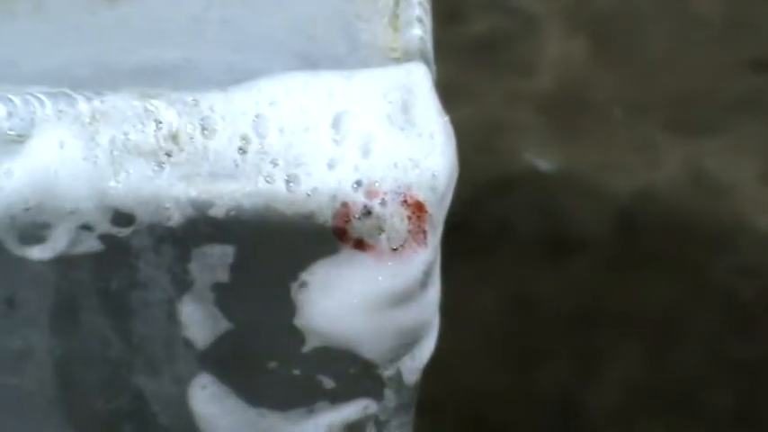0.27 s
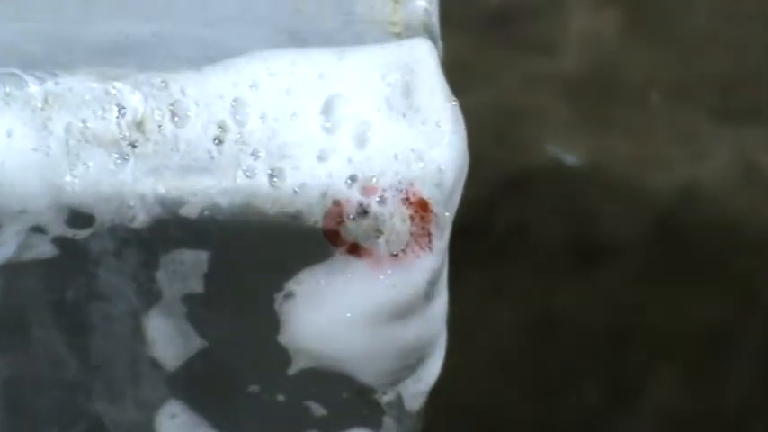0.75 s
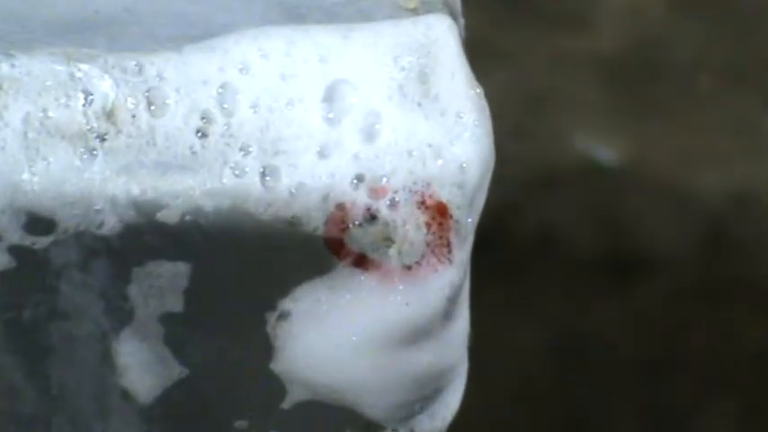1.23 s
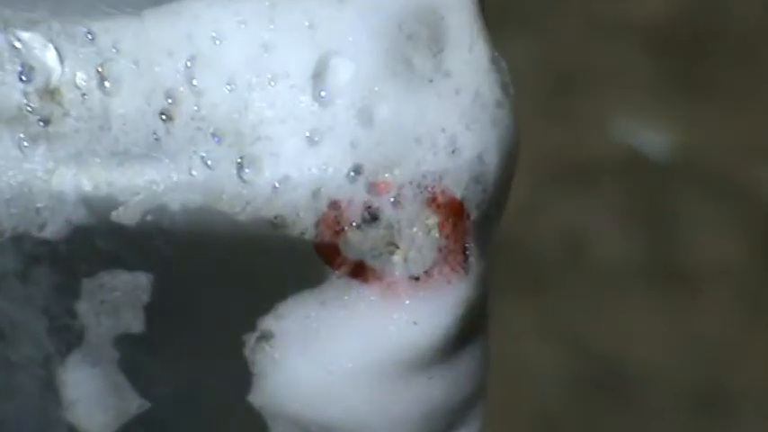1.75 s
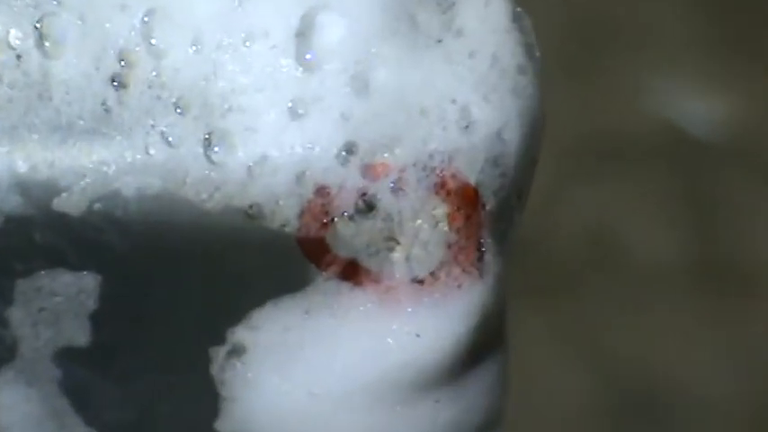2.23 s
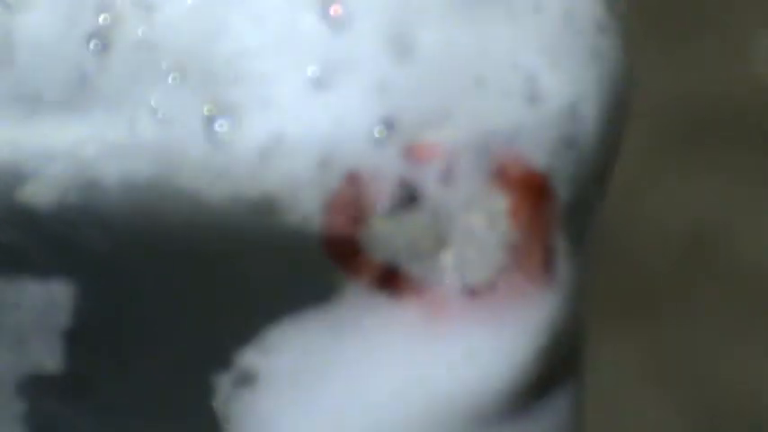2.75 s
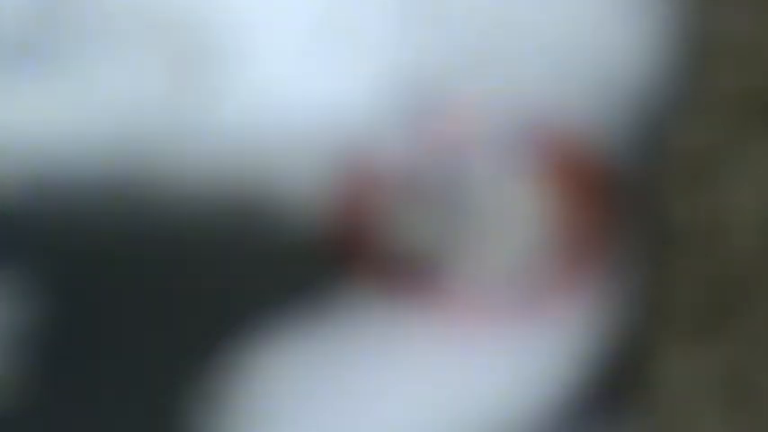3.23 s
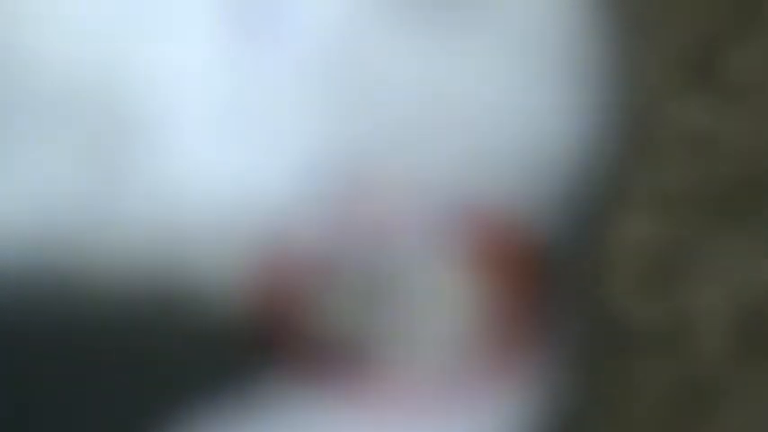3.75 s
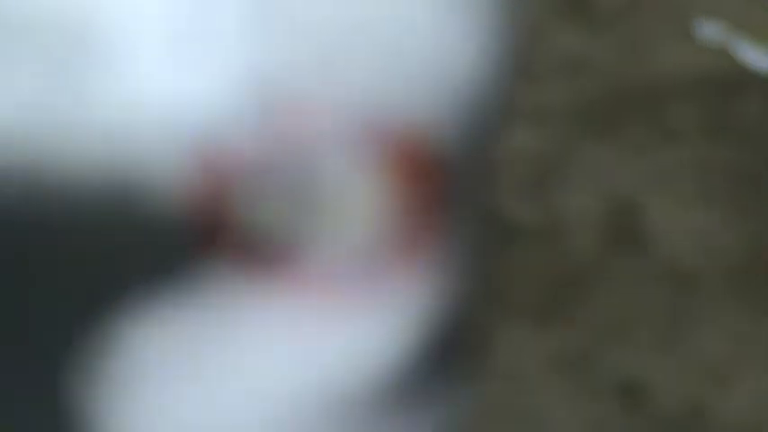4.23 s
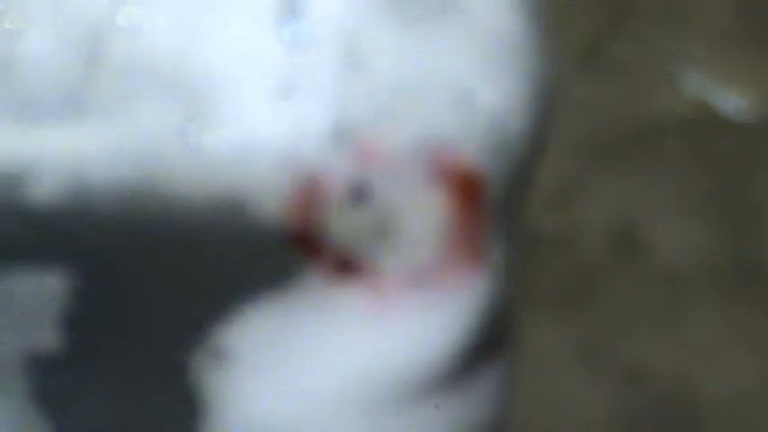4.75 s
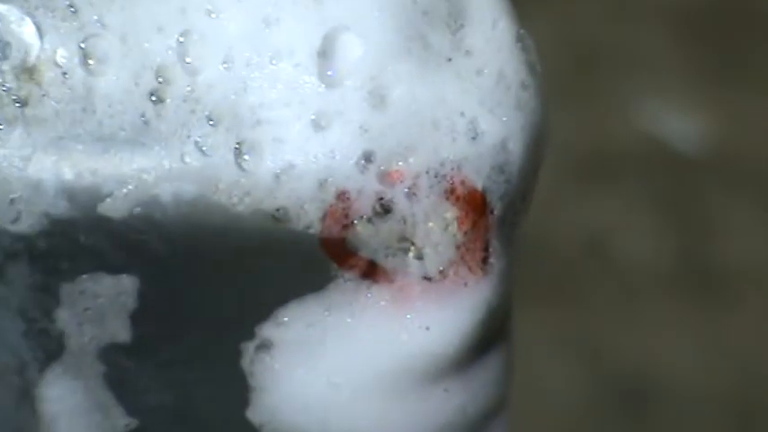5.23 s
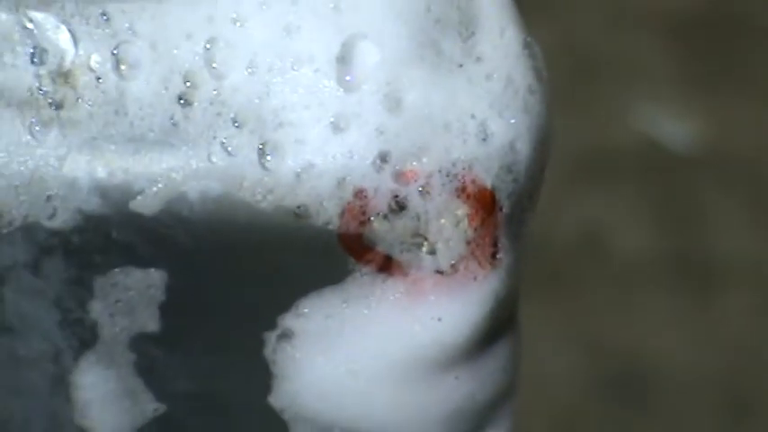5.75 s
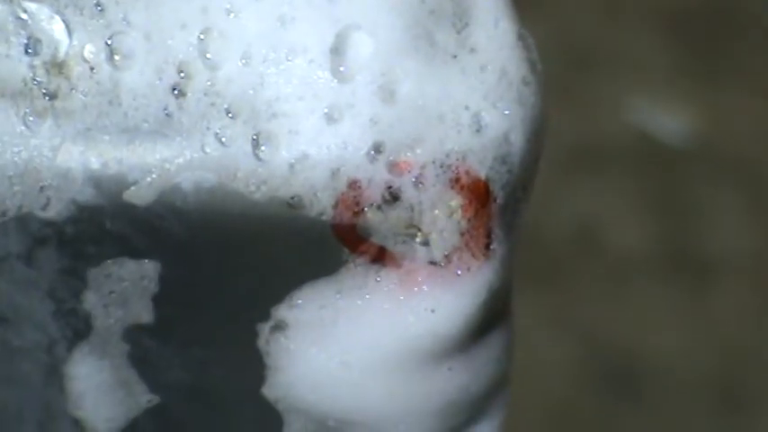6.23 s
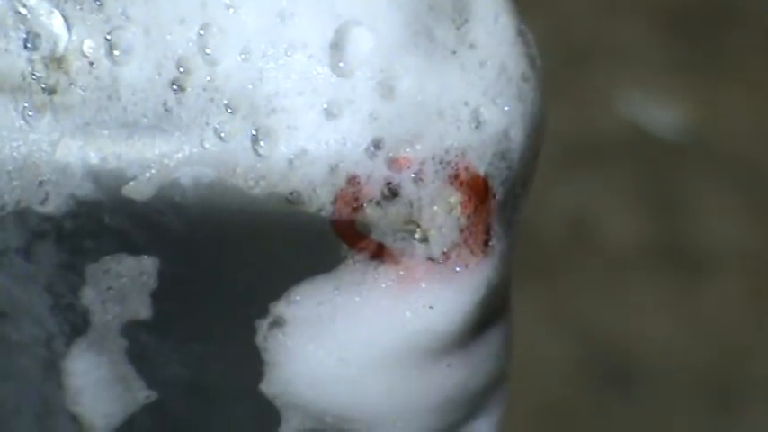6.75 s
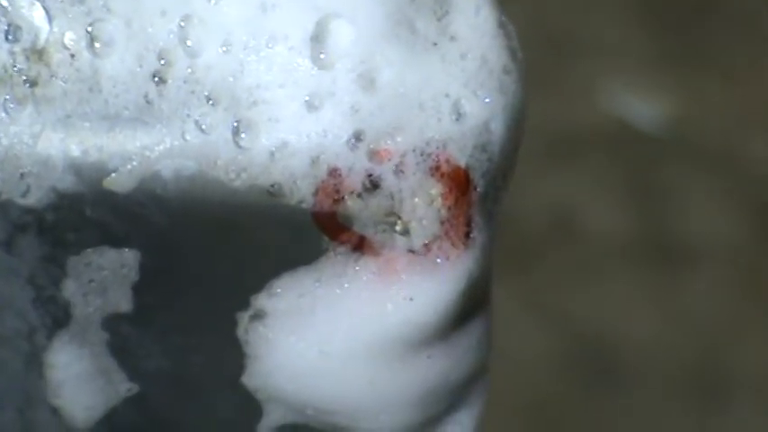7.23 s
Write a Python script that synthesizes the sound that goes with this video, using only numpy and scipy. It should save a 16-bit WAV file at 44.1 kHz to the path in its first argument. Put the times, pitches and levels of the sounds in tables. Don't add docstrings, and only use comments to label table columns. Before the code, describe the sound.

Bright air rush colored by ringing metal walls, dipping at two valve releases, plastic ticks up close, a soapy pinhole whistling, then a sudden boom.

```python
import sys
import numpy as np
from scipy import signal
from scipy.fft import rfft, irfft
from scipy.io import wavfile
from scipy.ndimage import uniform_filter1d

SR = 44100
rng = np.random.default_rng(int(sys.argv[2]) if len(sys.argv) > 2 else 0)


def volts_from_decibels(level):
    exponent = np.asarray(level, float) / 20
    return 10 ** exponent


def pcm_store(signal):
    levels = np.round(np.clip(np.atleast_2d(signal), -1, 1) * 32767)
    wavfile.write(sys.argv[1], SR, levels.astype(np.int16).T)


N = 330485
HZ = np.arange(N // 2 + 1) * SR / N + 1e-3
NOISE_TOP_HZ = 15830

# f/Hz, level per Hz/dB
SHOP_SPECTRUM = [(30, 2), (50, -4.5), (68, 1.5), (190, -2), (400, -8), (1000, -8.5), (2000, -13),
                 (4000, -21), (10000, -31), (16000, -26)]
SHOP_DB = -56.5
# f/Hz, side over mid level/dB
SIDE_LEVEL = [(60, -35), (200, -22), (380, -10.5), (700, -6.5), (1290, -5), (2380, -9.5), (4400, -6),
              (8120, -14.5), (15000, -15)]

# loudest t/s, level/dB, rise by 20 dB/s, fall by 20 dB/s
STROKES = [(.8, -48.5, .05, .3), (1.02, -41.5, 0.1, 0.12), (1.55, -45, 0.62, 0.51), (1.76, -42.5, 0.65, .2),
           (2.001, -32, 0.0081, 0.11), (2.2, -49.5, 0.38, 0.39), (3.5, -56, 0.046, .1),
           (3.62, -52, .1, .05), (7.44, -43.5, 0.15, .02)]
# loudest t/s, level/dB, rise by 20 dB/s, fall by 20 dB/s
SHUDDERS = [(1.105, -44, 0.034, 0.38), (1.22, -50, 0.13, 0.13), (1.45, -55.5, 0.45, 0.34),
            (1.8, -60, .1, .3), (2.03, -58, .08, .3), (2.2, -60, .3, 0.18), (3.56, -57, .09, 0.087),
            (7.44, -60, .3, .02)]
# t/s, peak level/dB, ring f/Hz, second
# ring f/Hz, left over right/dB
TICKS = [(0.984, -35.5, 1000, 1880, -5), (1.46, -32, 252, 500, 0), (1.608, -27.5, 500, 1000, -3),
         (1.896, -17, 1040, 2200, -9.5), (1.999, -35, 1000, 1600, -7), (2.193, -35, 180, 400, 0),
         (3.2847, -10.5, 1760, 2440, 5), (3.32, -31, 2320, 2200, -7), (3.738, -16.5, 1030, 1680, 6.5),
         (3.789, -25, 1840, 2580, 2), (5.806, -33, 554, 500, 0), (5.826, -31.5, 560, 2280, 2)]
CRACK_FROM_DB, CRACK_GROWTH, CRACK_TOP_DB = -18, 1.4, 2

# f/Hz, level per Hz/dB
LEAK_SPECTRUM = [(3000, -20), (6000, -8), (9000, -5), (11000, 0), (13000, -15), (15800, -7)]
LEAK_DB = -59
# t/s, f/Hz, level/dB
NOTES = [
    [(.02, 12750, -71), (.15, 12800, -66), (.3, 13000, -67), (.42, 13700, -68)],
    [(.46, 13080, -70), (.6, 13900, -65), (.78, 14000, -67), (.94, 14600, -62), (1.02, 14820, -65),
     (1.14, 14610, -65), (1.2, 14600, -64), (1.46, 14580, -65), (1.7, 14770, -66)],
    [(4.95, 9750, -60), (5.04, 9900, -60), (5.33, 10200, -55.5), (5.46, 10180, -59)],
    [(5.68, 9920, -53), (5.82, 9730, -52), (6.04, 9800, -53), (6.11, 10240, -55), (6.155, 9150, -49),
     (6.21, 8840, -47), (6.26, 8170, -47), (6.315, 8500, -48)],
    [(6.33, 9750, -46), (6.36, 9470, -48), (6.4, 9750, -47), (6.47, 9550, -49.5), (6.6, 10150, -53),
     (6.67, 10560, -51), (6.735, 10050, -49)],
    [(6.745, 8740, -46), (6.99, 8770, -47.5), (7.02, 8960, -46), (7.07, 8950, -47), (7.11, 8700, -46.5),
     (7.338, 8840, -45.5), (7.444, 8700, -43), (7.49, 8580, -62)],
]
# start t/s, length/s, f/Hz, level/dB
CHIRPS = [
    (1.719, .05, 14800, -65),
    (3.61, .11, 14350, -66),
    (4.28, .13, 9650, -55),
    (4.56, .09, 9800, -56),
    (4.76, 0.066, 10850, -57),
]
CHIRP_RISE, CHIRP_FADE_IN_DB = 0.013, 2
WAVER_HZ, DRY_ABOVE_HZ, DRY_WAVER_HZ = 75, 12000, 17

# t/s, swing f/Hz, swing level/dB, rattle level/dB
BANG = [
    (7.428, 175, -58, -53),
    (7.438, 171, -25, -45),
    (7.447, 145, -5, -33),
    (7.455, 99, -30, -35),
    (7.462, 95, -6, -17),
    (7.47, 132, -19.5, -22),
    (7.494, 129, -14, -15.5),
]
# f/Hz, width/Hz, level/dB
RATTLE = [(520, 250, -5), (1680, 670, -10), (2200, 330, -7), (2720, 270, -5), (3540, 680, -15.5),
          (5090, 140, -19)]
# f/Hz, level/dB, start t/s
PANEL = [
    (69.5, -14.5, 7.44),
    (744, -19.5, 7.455),
]

# t/s, spit level/dB, ring level/dB
VENTS = [
    (.8003, -32, -27),
    (5.626, -38, -26),
]
VENT_RING_HZ = 3650
# t/s, snap peak level/dB, long ring level/dB, long ring f/Hz, modes level/dB
LEVER = [
    (0.8002, -19, -44, 6820, -45),
    (1.015, -28.5, -56, 6790, -52),
    (1.3013, -20.5, -35, 6150, -56),
    (5.625, -13, -33, 6700, -26),
    (5.684, -23, -37, 6780, -37),
    (5.824, -21.5, -46, 6550, -52),
    (5.9426, -12.5, -24, 6470, -50),
]
# f/Hz, level/dB, time to fall 60 dB/s
LEVER_MODES = [(8750, -5, .035), (10150, -2, .035), (12850, 0, .045), (15330, -4, .05)]
LEVER_LR_DB = -4.5

# f/Hz, level per Hz/dB
JET_SPECTRUM = [(200, -33), (400, -21), (800, -22.5), (1100, -8.5), (1500, -7), (2400, -3), (3300, -1),
                (4300, -0.5), (6000, -1.5), (8300, -6), (9500, -10), (12300, -16.5), (13000, -18.5),
                (15800, -25.5)]
# f/Hz, width/Hz, gain over the jet/dB
TANK_WALL = [(1180, 40, 3), (1390, 60, 4), (1670, 40, 4), (1730, 26, 12), (1850, 30, 4), (2070, 40, 3),
             (2157, 28, 7), (2444, 35, 3), (2580, 40, 2), (2788, 30, 6), (2951, 22, 9), (3157, 28, 4),
             (3240, 35, 4), (3298, 28, 4), (3410, 35, 3), (3649, 20, 10), (3784, 25, 5), (3860, 28, 3),
             (4147, 25, 8), (4212, 28, 3), (4528, 35, 3), (6144, 30, 3), (6470, 35, 4), (6800, 40, 4),
             (8250, 400, 2)]
# f/Hz, width/Hz, level/dB
DRONE = [(188, 22, -11.5), (288, 24, -7.5), (500, 35, -7.5), (551.6, 37, 2), (598.6, 34, -7),
         (710, 180, -13.5), (925, 56, -7), (985.7, 20.5, 0.5)]
# t/s, level/dB
SUPPLY = [(0, -36.5), (1.4, -37.5), (1.72, -35), (2.2, -37.5), (5.6, -37), (6.1, -38), (7.494, -37)]
# let go t/s, pressed t/s
RELEASES = [
    (.83, 1.229),
    (5.64, 5.895),
]
# loudest t/s, jet level/dB, rise by 20 dB/s, fall by 20 dB/s
PUFFS = [
    (1.02, -42, .08, 0.091),
    (5.83, -48, 0.045, .1),
]
BLEED_DEPTH_DB, BLEED_S, REFILL_LAG_S = 27.5, 0.31, 0.033
EDGE_DB, EDGE_FOLLOWS = -2.5, 1
DRONE_DB, DRONE_FOLLOWS, DRONE_LAG_S = -51, 0.6, 0.044


def rms_one(x):
    return x / np.sqrt(np.mean(x ** 2) + 1e-20)


def in_time(rows):
    s, *columns = np.transpose(rows)
    return [np.interp(np.arange(N) / SR, s, column) for column in columns]


def sounding(rows):
    t = np.arange(N) / SR
    return np.clip(np.minimum(t - rows[0][0], rows[-1][0] - t) / 0.02 + 0.5, 0, 1)


def at_hz(points):
    hz, db = np.array(points).T
    return np.interp(np.log(HZ), np.log(hz), db)


def drift(rate):
    return rms_one(irfft(rfft(rng.standard_normal(N)) / (1 + (HZ / rate) ** 2), N))


def resonances(rows):
    total = 0
    for k, (hz, width, db) in enumerate(rows):
        total = total + (-1) ** k * volts_from_decibels(db) / (1 + 2j * (HZ - hz) / width)
    return total


def stereo_noise(response, side_db, lead, lean=0):
    mid, side = rfft(rng.standard_normal((2, N))) * response * (HZ < NOISE_TOP_HZ)
    side = volts_from_decibels(at_hz(SIDE_LEVEL) + side_db) * side + (1j * lead + lean) * mid
    return rms_one(irfft([mid + side, mid - side], N))


def ring(at_s, hz, t60, rise=0.000093, size=9000):
    out, start, t = np.zeros(N + size), round(at_s * SR), np.arange(size) / SR
    fade = volts_from_decibels(-60 * t / t60) * (1 - np.exp(-t / rise))
    out[start:start + size] = np.sin(2 * np.pi * hz * t) * fade
    return out[:N]


def snap(at_s, low_hz, high_hz, t60, order=2, size=6000):
    out, start, t = np.zeros(N + size), round(at_s * SR), np.arange(size) / SR
    band = signal.butter(order, [low_hz, high_hz], "band", fs=SR, output="sos")
    burst = rng.standard_normal(size) * volts_from_decibels(-60 * t / t60)
    out[start:start + size] = signal.sosfilt(band, burst)
    return out[:N] / np.abs(out).max()


def pan(x, lr_db):
    return x * volts_from_decibels(np.array([[lr_db / 2], [-lr_db / 2]]))


def even(x, size):
    return x / np.sqrt(uniform_filter1d(np.mean(x ** 2, axis=0), size=size))


def swells(rows):
    t = np.arange(N) / SR
    power = 0
    for s, db, rise, fall in rows:
        drop_db = 20 * np.maximum((s - t) / rise, (t - s) / fall)
        power = power + volts_from_decibels(2 * (db - drop_db))
    return np.sqrt(power)


def workshop():
    level = volts_from_decibels(SHOP_DB + 1.2 * drift(5))
    return level * stereo_noise(volts_from_decibels(at_hz(SHOP_SPECTRUM)), side_db=12.5, lead=0.05)


def tick(s, db, hz, second_hz):
    rings = 0.85 * ring(s + 0.00099, hz, 0.023, rise=0.00072)
    rings += 0.69 * ring(s, second_hz, 0.018, rise=0.0008)
    rings += 0.14 * ring(s, 688, 0.052, rise=0.00092)
    crack = snap(s, 2120, 8600, 0.011, order=4)
    crack += 0.52 * ring(s, 9110, 0.0067, rise=0.00027)
    crack += 0.62 * snap(s + 0.0005, 670, 3870, 0.02)
    crack_db = min(CRACK_GROWTH * (db - CRACK_FROM_DB), CRACK_TOP_DB)
    thud_gain = 0.5 * min(1000 / hz, hz / 1000) ** 3
    thud = thud_gain * snap(s, 233, 2230, 0.053)
    return volts_from_decibels(db) * (rings + volts_from_decibels(crack_db) * crack + thud)


def hand():
    dull = 1 / (1 + (HZ / 2200) ** 4)
    rub_body = resonances([(283, 940, -11), (1000, 1300, 8.5), (1820, 1430, 5)])
    rub = stereo_noise(dull * rub_body, side_db=-2.0, lead=0.092)
    shudder = stereo_noise(resonances([(73.5, 30, -4.5), (166, 33, 2.5)]), side_db=3.0, lead=0.049)
    out = swells(STROKES) * volts_from_decibels(2.0 * drift(67)) * rub
    out = out + swells(SHUDDERS) * even(shudder, size=1200)
    for s, db, hz, second_hz, lr_db in TICKS:
        out = out + pan(tick(s, db, hz, second_hz), lr_db)
    return out


def leak():
    colour = volts_from_decibels(at_hz(LEAK_SPECTRUM)) * (HZ > LEAK_SPECTRUM[0][0])
    return volts_from_decibels(LEAK_DB + 1.4 * drift(7)) * stereo_noise(colour, side_db=6.0, lead=0.1)


def whistle():
    notes = [list(map(tuple, rows)) for rows in NOTES]
    for s, length, hz, db in CHIRPS:
        end_hz = hz * (1 + CHIRP_RISE)
        notes.append([(s, hz, db - CHIRP_FADE_IN_DB), (s + length / 2, hz, db), (s + length, end_hz, db)])
    notes.sort()
    hz, level_db = in_time([row for rows in notes for row in rows])
    gate = np.minimum(sum(sounding(rows) for rows in notes), 1)
    waver = drift(220) + 0.7 * drift(40)
    flutter = volts_from_decibels(3.5 * drift(90) + 1.2 * drift(25))
    waver_hz = np.where(hz > DRY_ABOVE_HZ, DRY_WAVER_HZ, WAVER_HZ)
    phase = 2 * np.pi * np.cumsum(hz + 0.9 * waver_hz * waver) / SR
    return pan(np.sqrt(2) * gate * volts_from_decibels(level_db) * flutter * np.sin(phase), -3.5)


def bang():
    hz, swing_db, rattle_db = in_time(BANG)
    phase = 2 * np.pi * np.cumsum(hz * (np.arange(N) > 7.43 * SR)) / SR
    swing = np.sqrt(2) * volts_from_decibels(swing_db) * np.sin([phase + 3.23, phase + 1.63])
    rattle = even(stereo_noise(resonances(RATTLE), side_db=-6.0, lead=0.24), size=350)
    tones = 0
    for tone_hz, db, s in PANEL:
        left = ring(s, tone_hz, 0.65, rise=0.0081)
        right = ring(s + 0.00021, tone_hz, 0.6, rise=0.0092)
        tones = tones + np.sqrt(2) * volts_from_decibels(db) * np.array([left, right])
    return sounding(BANG) * (swing + volts_from_decibels(rattle_db) * rattle) + tones


def vents():
    out = 0
    for s, spit_db, ring_db in VENTS:
        spit = volts_from_decibels(spit_db) * snap(s, 12200, 14000, 0.12, order=3)
        out = out + spit + volts_from_decibels(ring_db) * ring(s, VENT_RING_HZ, 0.037)
    return pan(out, LEVER_LR_DB)


def lever():
    out = 0
    for s, db, ring_db, hz, modes_db in LEVER:
        modes = 0
        for mode_hz, mode_db, t60 in LEVER_MODES:
            modes = modes + volts_from_decibels(mode_db + rng.normal(0, 2)) * ring(s, mode_hz, t60, rise=0.0008)
        hit = snap(s, 3700, 12800, 0.0031, order=3) + 1.2 * ring(s, 8100, 0.0027)
        hit += 0.36 * snap(s + 0.0014, 3600, 7100, 0.01)
        hit += 0.18 * snap(s, 3200, 12000, 0.26, order=4)
        hit += 0.11 * snap(s, 530, 3600, 0.11) + 0.22 * snap(s, 3130, 4500, 0.019)
        cluster = ring(s, hz, 0.15) + 0.45 * ring(s, hz + 95, 0.13) + 0.3 * ring(s, hz - 140, 0.1)
        out = out + pan(volts_from_decibels(db) * hit + volts_from_decibels(modes_db) * modes + volts_from_decibels(ring_db) * cluster, LEVER_LR_DB)
    return out


def valve_fall_db():
    t = np.arange(N) / SR
    fall = 0
    for off, on in RELEASES:
        bleed = 1 - np.exp(-np.clip(t - off, 0, on - off) / BLEED_S)
        refill = np.exp(-np.maximum(t - on, 0) / REFILL_LAG_S)
        fall = fall + BLEED_DEPTH_DB * bleed * refill
    puff = swells(PUFFS) / volts_from_decibels(SUPPLY[0][1])
    return -10 * np.log10(volts_from_decibels(-2 * fall) + puff ** 2)


def tank_drone(fall_db):
    keep = np.exp(-1 / (DRONE_LAG_S * SR))
    late_fall_db = signal.lfilter([1 - keep], [1, -keep], fall_db)
    power = sum(volts_from_decibels(2 * db) / (1 + (2 * (HZ - hz) / width) ** 2) ** 2 for hz, width, db in DRONE)
    level_db = DRONE_DB - DRONE_FOLLOWS * late_fall_db + 0.1 * drift(18)
    return stereo_noise(np.sqrt(power), side_db=-19.0, lead=0.23) * volts_from_decibels(level_db)


def air():
    (supply_db,), fall_db = in_time(SUPPLY), valve_fall_db()
    bumps = uniform_filter1d(rng.standard_normal(len(HZ)), size=130)
    thicket = rms_one(uniform_filter1d(bumps, size=130))
    walls = sum(db / (1 + (2 * (HZ - hz) / width) ** 2) for hz, width, db in TANK_WALL)
    colour = volts_from_decibels(at_hz(JET_SPECTRUM) + 2.0 * thicket + walls)
    high = 1 / (1 + (8500 / HZ) ** 8)
    body = stereo_noise(colour * np.sqrt(1 - high), side_db=-2.0, lead=0.13, lean=0.049)
    body = body * volts_from_decibels(0.57 * drift(2.4) - fall_db)
    edge = stereo_noise(colour * np.sqrt(high), side_db=5.0, lead=0.13, lean=0.021)
    edge = edge * volts_from_decibels(EDGE_DB - 8 + 0.45 * drift(22) - EDGE_FOLLOWS * fall_db)
    return volts_from_decibels(supply_db) * (body + edge) + tank_drone(fall_db)


def scene():
    return workshop() + hand() + leak() + whistle() + bang() + vents() + lever() + air()


def low_pass(x):
    return signal.sosfilt(signal.butter(12, 16510, fs=SR, output="sos"), x)


def record(dry):
    cut = signal.sosfilt(signal.butter(3, 48, "high", fs=SR, output="sos"), dry)
    mix = 0.75 * np.tanh(cut / 0.77)
    return low_pass(mix)


dry = scene()
out = record(dry)
pcm_store(out)
```